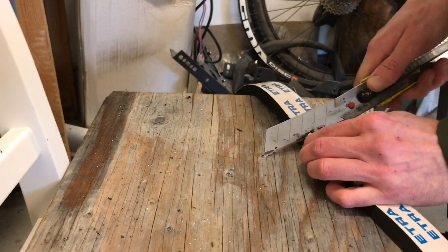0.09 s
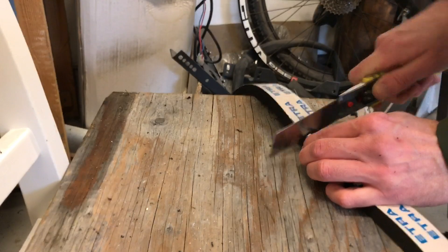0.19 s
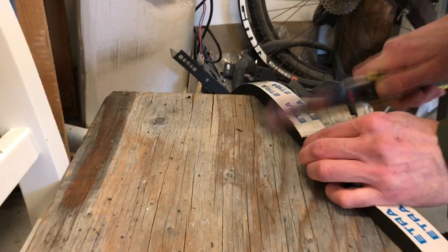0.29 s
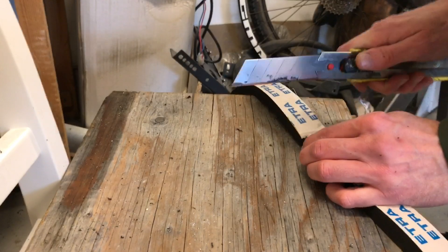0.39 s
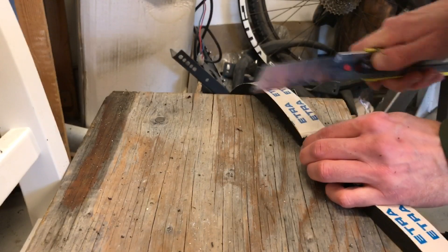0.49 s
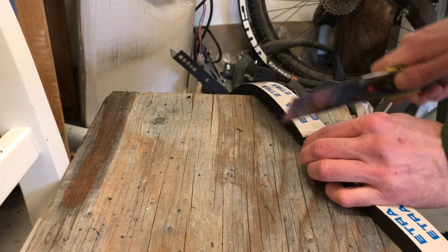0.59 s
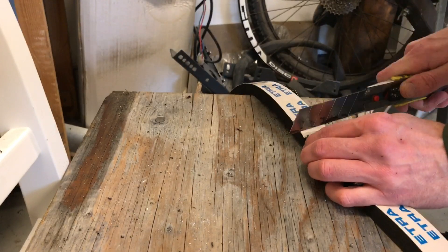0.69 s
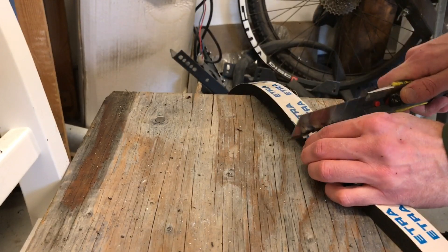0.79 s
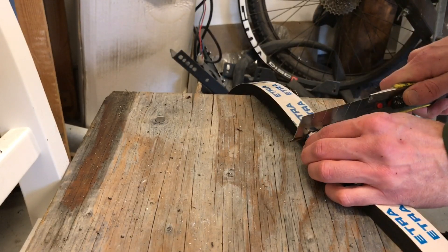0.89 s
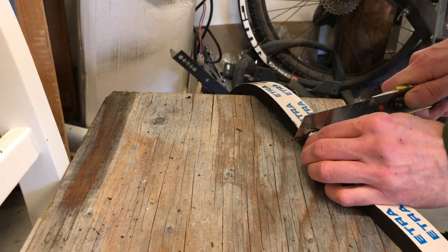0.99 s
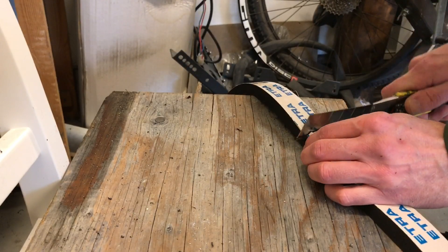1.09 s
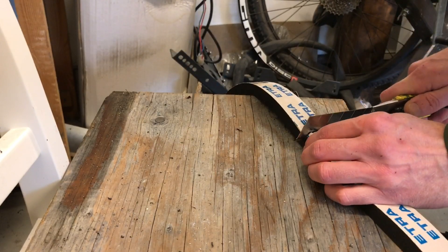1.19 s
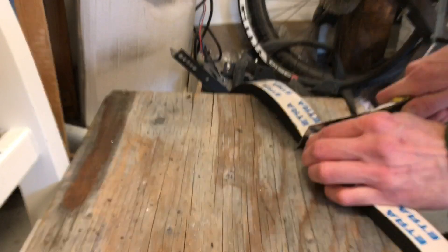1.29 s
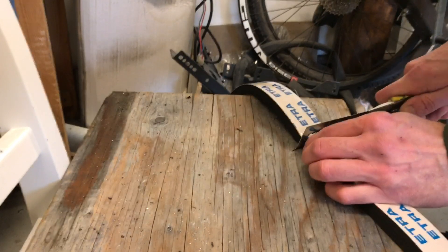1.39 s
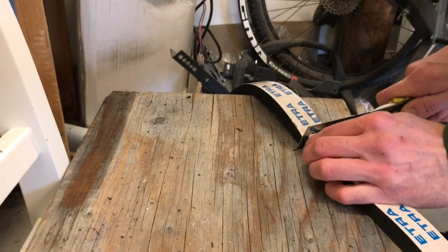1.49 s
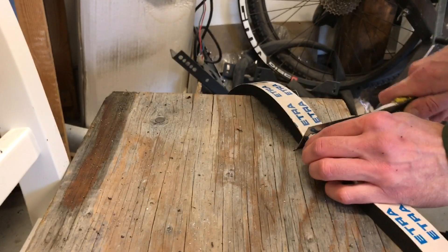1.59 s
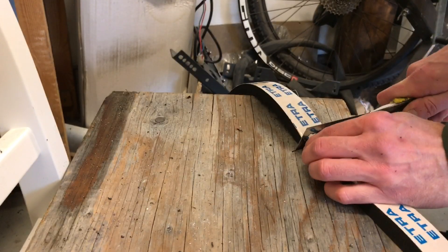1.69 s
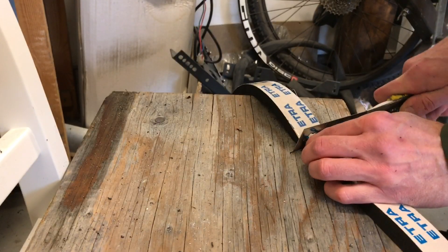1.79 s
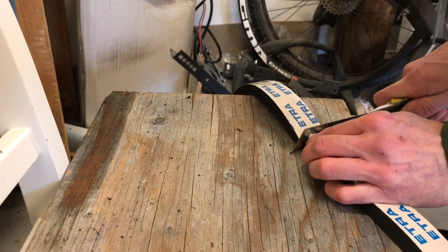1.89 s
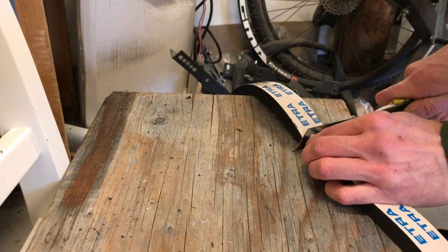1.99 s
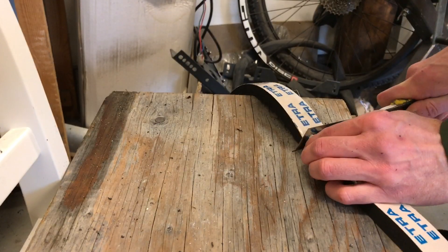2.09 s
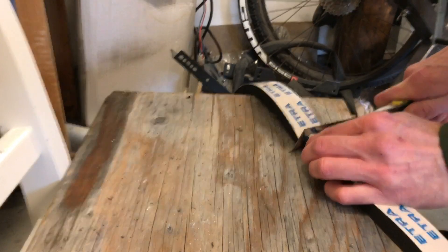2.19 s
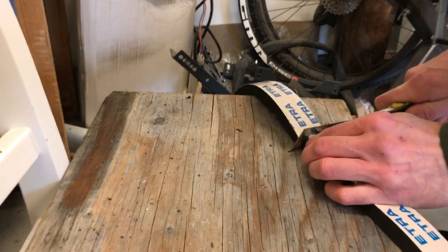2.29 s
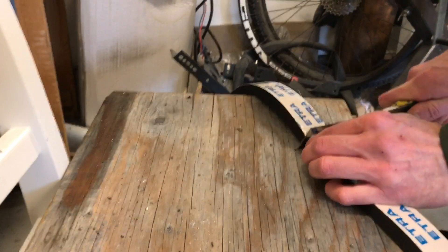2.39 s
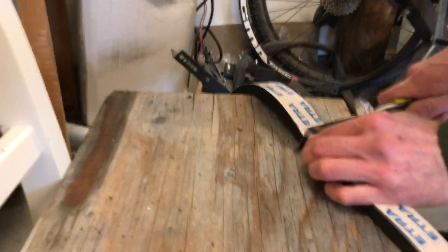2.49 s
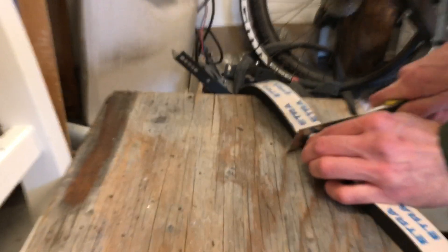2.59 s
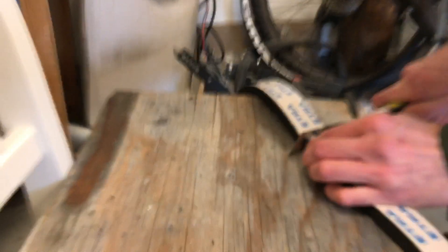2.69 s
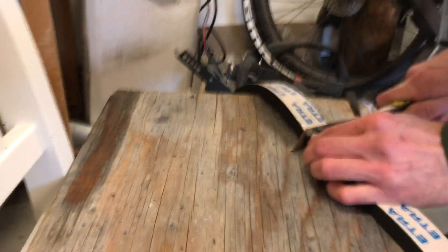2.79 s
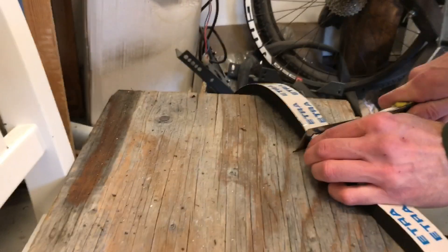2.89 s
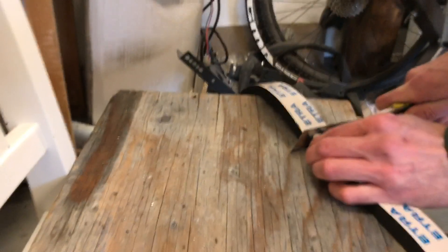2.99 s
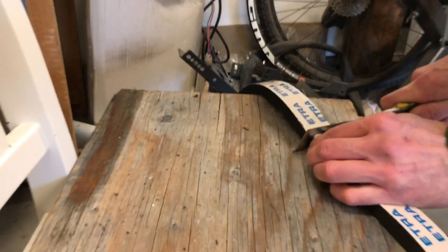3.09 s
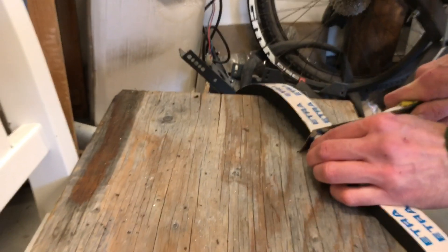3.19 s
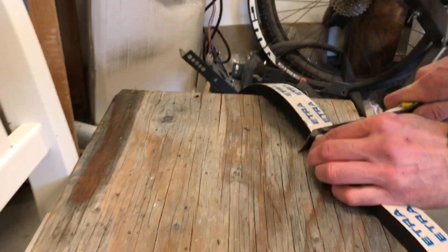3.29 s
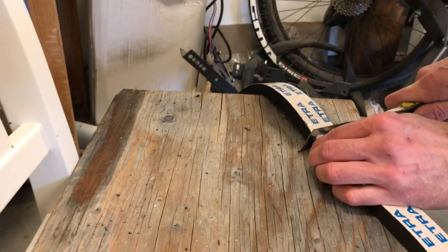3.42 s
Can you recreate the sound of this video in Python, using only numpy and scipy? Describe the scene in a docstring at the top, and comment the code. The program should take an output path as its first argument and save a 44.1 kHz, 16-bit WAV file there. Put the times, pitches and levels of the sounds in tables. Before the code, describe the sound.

A utility knife, close up in a small, quiet workshop: after a faint scrape, its slider clacks loudly at 0.2 and 0.3 seconds. Near quiet with tiny ticks follows, then a click and scrape with a low wooden thump at 1.3. Sparse faint ticks lead to crunchy cutting clicks at 2.55-2.8, a bench knock at 2.95, low rumble, and short scrapes with a brief faint squeak near 3.2. Soft hiss throughout.

```python
"""A utility knife on a wooden bench in a small workshop, close to a phone: its slider ratchets twice, then
the blade ticks, scrapes and once squeaks through foam tape. Clicks are short contacts that ring a knife mode;
scrapes and one dense knock are random slips that ring a broad resonance and steel; the squeak is a pitched
run of slips. Hands and tape rustle faintly, the bench booms in decaying sines and rumbles in shaped noise,
and the room adds a tail and hiss."""
import sys
import numpy as np
from scipy import signal
from scipy.fft import rfft, irfft
from scipy.io import wavfile
from scipy.ndimage import uniform_filter1d

SR = 44100
rng = np.random.default_rng(int(sys.argv[2]) if len(sys.argv) > 2 else 0)


def bounce(signal):
    """Save signal as a 16-bit WAV file at the path given by the first command-line argument."""
    frames = np.transpose(np.atleast_2d(signal))
    limited = np.clip(frames, -1, 1)
    pcm = np.round(limited * 32767).astype(np.int16)
    wavfile.write(sys.argv[1], SR, pcm)


N = 152145  # samples


def undb(db):
    """Decibels to amplitude factor."""
    return 10 ** (np.asarray(db) / 20)


def unit(x):
    """Scale to rms 1."""
    return x / np.sqrt(np.mean(x ** 2))


def decay(t, t60):
    """Exponential decay that falls 60 dB in t60 seconds."""
    return undb(-60 * t / t60)


def ring(hz, t60, size=2048):
    """A struck mode: one decaying sine."""
    t = np.arange(size) / SR
    return np.sin(2 * np.pi * hz * t) * decay(t, t60)


def coloured(shape):
    """Noise of rms 1 whose spectrum follows points of (Hz, dB), joined on a log frequency axis."""
    hz, db = np.array(shape).T
    log_hz = np.log(np.arange(N // 2 + 1) * SR / N + 1)
    gain = undb(np.interp(log_hz, np.log(hz), db))
    return unit(irfft(rfft(rng.standard_normal(N)) * gain, N))


def walk(step_s):
    """Smooth random drift of rms 1: noise averaged twice over step_s."""
    k = int(step_s * SR)
    return unit(uniform_filter1d(uniform_filter1d(rng.standard_normal(N), k), k))


def add(out, start_s, x):
    """Mix x into out from start_s on, cut at the end."""
    i = int(start_s * SR)
    out[i:i + len(x)] += x[:N - i]


# hiss spectrum: freq_hz [Hz], density_db [relative dB per Hz]
HISS_SPECTRUM = [(15, -38), (25, -7), (92, 2.5), (503, -10), (2990, -19), (3520, -14.5), (7710, -21),
                 (12900, -21.5), (16000, -19.5)]
HISS_DB, HISS_SWELL_DB, HISS_SWELL_S = -65, -2, 0.3


def room_hiss():
    """Steady coloured noise of the quiet room, its level drifting slowly."""
    return coloured(HISS_SPECTRUM) * undb(HISS_DB + HISS_SWELL_DB * walk(HISS_SWELL_S))


RUSTLES_PER_S, RUSTLE_T60_S = 40, 0.0088
RUSTLE_DB, RUSTLE_SCATTER_DB = -63, 1  # floor and mean excess of the ticks, before the treble tilt


def rustle():
    """Faint ticks of hands and tape: short decaying noise puffs at random moments."""
    chance, strength = rng.random((2, N))
    tick_gain = undb(RUSTLE_DB - RUSTLE_SCATTER_DB * np.log(strength + 1e-2))
    ticks = (chance < RUSTLES_PER_S / SR) * tick_gain
    puffs = signal.fftconvolve(ticks, decay(np.arange(1024) / SR, RUSTLE_T60_S))[:N]
    return np.diff(puffs * rng.standard_normal(N), prepend=0)  # differencing tilts it to treble


# steel blade modes: freq_hz [Hz], level_db [relative dB]
BLADE_MODES = [(1700, -32), (3600, 8), (5200, 4.5), (6850, 5.5), (8400, 6), (10200, 0), (11600, 2),
               (14000, 1)]
BLADE_T60_S = .007


def blade():
    """Impulse response of the blade: all its modes ring together."""
    return sum(undb(level_db) * ring(freq_hz, BLADE_T60_S) for freq_hz, level_db in BLADE_MODES)


# blade strokes in the foam, and the dense burst of the first knock at 0.2 s: start_s [s], length_s [s],
# level_db [dB, rms of the slips before the fade], resonance_hz [Hz], blade_db [dB against the resonance],
# fade_db [dB change over the burst]
SLIP_BURSTS = [(0.062, 0.073, -59.5, 3190, -5, -2.5), (0.2014, 0.0083, -23, 4900, -8, 7.5),
               (0.803, 0.043, -77.5, 2960, -1.5, 13), (1.09, 0.042, -63.5, 2560, 4.5, -9),
               (1.259, 0.08, -53, 1790, -10, -11), (1.758, 0.066, -67, 2560, 6.5, 2.5),
               (1.844, .03, -65, 6000, -4, -6), (1.954, 0.054, -65, 3770, 1, -11),
               (2.127, 0.12, -76, 3750, 6.5, 1), (2.227, 0.032, -49.5, 6370, 8, -9),
               (2.36, 0.065, -69.5, 3700, 2, 12), (2.551, 0.037, -46, 3400, -5, 8),
               (2.59, 0.12, -51, 2400, -5, -17), (2.691, 0.043, -56, 2460, 1, -6),
               (2.777, 0.065, -50.5, 2080, 5, -17.5), (2.935, .04, -49.5, 2550, 1.5, -5),
               (2.982, 0.13, -72, 2030, 1, 11), (3.159, 0.049, -51, 5240, 1.5, -3),
               (3.24, 0.11, -67, 2000, -5, -6)]
SLIPS_PER_S, SLIP_SCATTER_DB = 2400, 3
EDGE_S = 0.007  # fade at each end of a burst
RESONANCE_T60_S, GRIT_DB = 0.0011, -5


def scrapes_and_first_knock():
    """Dense uneven slips at random moments excite a broad resonance, grit and the blade."""
    out, steel = np.zeros(N), blade()
    for start_s, length_s, level_db, resonance_hz, blade_db, fade_db in SLIP_BURSTS:
        t = np.arange(int(length_s * SR)) / SR
        chance, strength, side = rng.random((3, len(t)))
        slip_gain = undb(-SLIP_SCATTER_DB * np.log(strength + 1e-4))
        slips = (chance < SLIPS_PER_S / SR) * slip_gain * np.sign(side - .5)
        edges = np.clip(np.minimum(t, length_s - t) / EDGE_S, 0, 1)
        # the tiny offset guards a burst without any slip
        slips = unit(slips + 1e-9) * undb(level_db + fade_db * t / length_s) * edges
        resonance = ring(resonance_hz, RESONANCE_T60_S)
        body = undb(blade_db) * steel / np.linalg.norm(steel) + resonance / np.linalg.norm(resonance)
        body[:3] += undb(GRIT_DB) * np.array([1, 0, -1])  # grit: a bare click per slip
        add(out, start_s, signal.fftconvolve(slips, body))
    return out


# ticks of slider and blade: start_s [s], level_db [dB, peak of the ring], ring_hz [Hz],
# treble_db [dB, crack against ring before the common TREBLE_GAIN_DB]
TICKS = [(0.0705, -32.5, 3630, -14), (0.163, -35, 5780, -7), (0.213, -18.5, 3060, -8),
         (0.218, -33.5, 3830, -10), (0.2926, -14, 3680, -20.5), (0.2987, -19, 2120, -38),
         (0.31, -25.5, 2400, -17), (0.4914, -46, 4030, -15), (0.5597, -47, 3840, -8),
         (0.5745, -48, 5160, -5), (0.615, -46, 2440, -7), (0.936, -44, 3740, -19),
         (1.2408, -45.5, 3640, -10), (1.2488, -23, 3440, -17), (1.2808, -30, 3700, -9),
         (1.2883, -25.5, 1780, -18.5), (1.2935, -34, 1610, -9), (1.6374, -41.5, 3300, -12),
         (1.734, -41, 3600, -11), (1.7624, -42, 3630, -3), (1.7752, -49, 3530, 1), (1.9101, -50, 4040, -12),
         (2.0532, -47.5, 3830, -8), (2.4492, -43, 3750, -10), (2.4813, -36.5, 3550, -14),
         (2.5564, -36, 3370, 0), (2.5656, -28, 2560, -9), (2.5733, -22.5, 3550, -17),
         (2.5778, -29.5, 2240, -9), (2.605, -38, 2400, -16), (2.6195, -28, 2500, -11),
         (2.6279, -43, 2240, -23), (2.6371, -27.5, 2370, -24), (2.7345, -34, 3420, -13),
         (2.7894, -32, 2070, -26), (2.9275, -37.5, 2220, -9), (3.1754, -44, 2260, -2),
         (3.2286, -51, 5270, -2), (3.2318, -35, 5340, -16), (3.3465, -53.5, 4200, -1.5)]
CONTACT_MS, RING_T60_S = .6, 0.0036
CRACK_T60_S, CRACK_HZ, CRACK_TOP_HZ, TREBLE_GAIN_DB = 0.0063, 4400, 11900, 8


def clicks():
    """A brief uneven contact rings one mode of the knife and gives a bright crack."""
    out, t = np.zeros(N), np.arange(2048) / SR
    crack_band = signal.butter(1, [CRACK_HZ, CRACK_TOP_HZ], "band", fs=SR, output="sos")
    contact = np.exp(-(t * 1000 / CONTACT_MS - 2) ** 2)
    crack_envelope = signal.fftconvolve(contact, decay(t, CRACK_T60_S))[:2048]
    for start_s, level_db, ring_hz, treble_db in TICKS:
        contact_noise, crack_noise = rng.standard_normal((2, 2048))
        body = signal.fftconvolve(contact_noise * contact, ring(ring_hz, RING_T60_S))[:2048]
        crack = signal.sosfilt(crack_band, crack_noise * crack_envelope)
        body /= np.abs(body).max()
        crack *= undb(treble_db + TREBLE_GAIN_DB) / np.abs(crack).max()
        add(out, start_s - CONTACT_MS / 1000, undb(level_db) * (body + crack))
    return out


# knocks in the bench: start_s [s], level_db [dB, sine before its decay and soft onset],
# mode_hz [Hz], t60_s [s]
KNOCKS = [(0.089, -53.5, 94, 0.24), (.2, -36, 244, 0.08), (.203, -44, 169, .08), (.225, -36.5, 97.7, 0.27),
          (0.293, -39.5, 181, 0.12), (.3, -58, 68, 1), (0.971, -53, 100, .2), (1.125, -44.5, 97, 0.19),
          (1.289, -33, 202, 0.034), (1.298, -25.5, 99, 0.14), (1.399, -52.5, 99, 0.59),
          (1.79, -49.5, 535, 0.036), (2.305, -42, 701, 0.072), (2.515, -45.5, 530, 0.047),
          (2.779, -32.5, 486, 0.013), (2.956, -23.5, 193, 0.049), (3.244, -43, 152, 0.089)]
PUSH_CYCLES = 0.84  # time constant of the soft onset, in cycles of the mode


def bench_knocks():
    """Soft pushes ring low bench modes, each a decaying sine with a gentle onset."""
    out = np.zeros(N)
    t = np.arange(32768) / SR
    for start_s, level_db, mode_hz, t60_s in KNOCKS:
        onset = 1 - np.exp(-t * mode_hz / PUSH_CYCLES)
        add(out, start_s, undb(level_db) * ring(mode_hz, t60_s, size=len(t)) * onset)
    return out


# rumble level under the pressing hands: time_s [s], level_db [dB, rms before the flicker]
RUMBLE_LEVEL = [(2.0, -98), (2.23, -57), (3.012, -51), (3.45, -66)]
# rumble spectrum: freq_hz [Hz], density_db [relative dB per Hz]
RUMBLE_SPECTRUM = [(15, -41), (25, -7.5), (86, 3.5), (345, -15.5), (692, -22), (1200, -26.5), (1560, -56),
                   (2640, -120)]
RUMBLE_FLICKER_DB, RUMBLE_FLICKER_S = 4.5, 0.024


def bench_rumble():
    """Low noise in the wood while the hands press, its level flickering."""
    time_s, level_db = np.array(RUMBLE_LEVEL).T
    press_db = np.interp(np.arange(N) / SR, time_s, level_db, left=-120)
    return coloured(RUMBLE_SPECTRUM) * undb(press_db + RUMBLE_FLICKER_DB * walk(RUMBLE_FLICKER_S))


# path of the squeak: time_s [s], pitch_hz [Hz, before jitter], level_db [dB]
SQUEAK_PATH = [(3.158, 950, -53), (3.184, 1230, -45.5), (3.216, 978, -49)]
SQUEAK_JITTER, JITTER_S = 0.067, 0.00041  # rms share of the pitch, averaging time
SQUEAK_TOP_HZ = 3460


def squeak():
    """Slips that lock into a pitch: a slightly uneven pulse train that arches up and down."""
    time_s, pitch_hz, level_db = np.array(SQUEAK_PATH).T
    t = np.arange(time_s[0], time_s[-1], 1 / SR)
    pitch = np.interp(t, time_s, pitch_hz)
    phase = np.cumsum(pitch * (1 + SQUEAK_JITTER * walk(JITTER_S)[:len(t)])) / SR
    pulses = np.diff(np.floor(phase), prepend=0)  # one per completed cycle
    low_pass = signal.butter(2, SQUEAK_TOP_HZ, fs=SR, output="sos")
    tone = signal.sosfilt(low_pass, pulses - pitch / SR)  # the mean pulse rate is taken off
    out = np.zeros(N)
    add(out, time_s[0], unit(tone) * undb(np.interp(t, time_s, level_db)))
    return out


# room tail by band: centre_hz [Hz], t60_s [s], level_db [relative dB, before TAIL_GAIN]
ROOM_BANDS = [(710, 0.21, -18.5), (1510, 0.72, -25.5), (3050, 0.4, -20.5), (5600, 0.43, -22.5),
              (9900, 0.081, -16.5)]
TAIL_RISE_S, TAIL_GAIN = 0.002, 4


def room(direct):
    """Direct sound plus a diffuse noise tail that dies band by band."""
    t = np.arange(SR // 2) / SR
    tail = np.zeros(len(t))
    for centre_hz, t60_s, level_db in ROOM_BANDS:
        band = signal.butter(1, [centre_hz / 2.16, centre_hz * 1.85], "band", fs=SR, output="sos")
        noise = signal.sosfilt(band, rng.standard_normal(len(t)))
        evening = np.sqrt(SR * t60_s / (6 * np.log(10)))  # evens out long and short decays
        tail += undb(level_db) * noise * decay(t, t60_s) / evening
    tail *= np.clip(t / TAIL_RISE_S, 0, 1) * TAIL_GAIN
    return direct + signal.fftconvolve(direct, tail)[:N]


def scene():
    """Knife and rustle sound in the room; bench and hiss come without its tail."""
    knife = scrapes_and_first_knock() + clicks() + squeak()
    bench = bench_knocks() + bench_rumble()
    return (room(knife + rustle()) + bench + room_hiss())[None]


TOP_HZ = 15800


def record(dry):
    """The phone microphone cuts the top with a steep low-pass."""
    return signal.sosfilt(signal.ellip(8, .2, 60, TOP_HZ, fs=SR, output="sos"), dry)


dry = scene()
out = record(dry)
bounce(out)
```